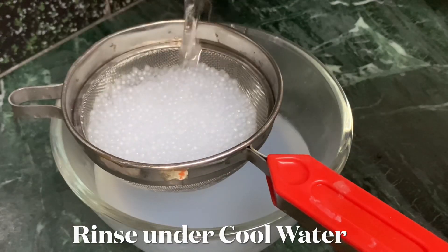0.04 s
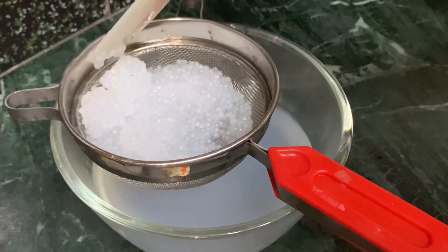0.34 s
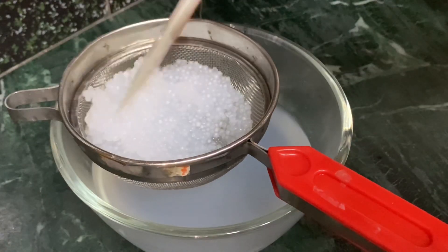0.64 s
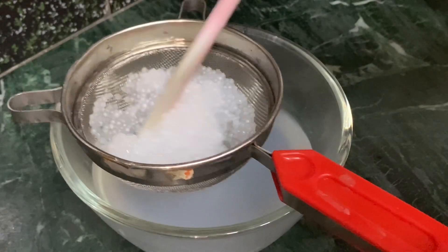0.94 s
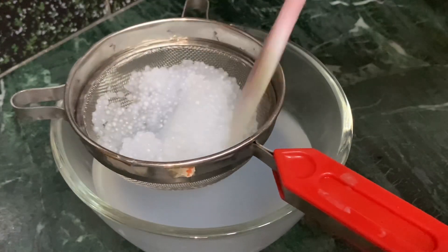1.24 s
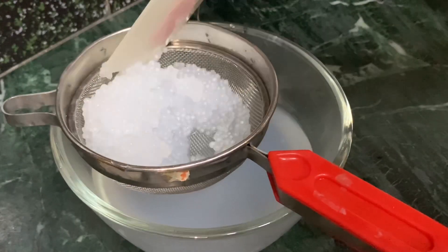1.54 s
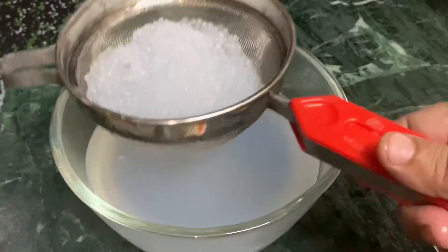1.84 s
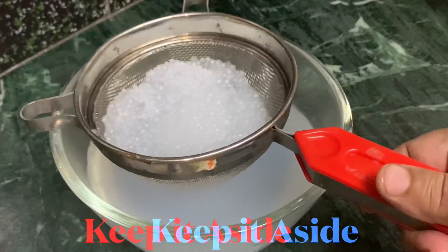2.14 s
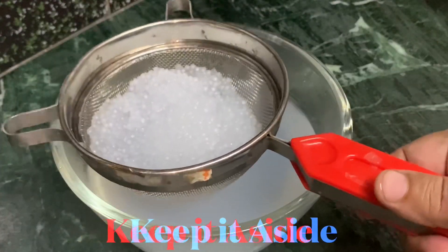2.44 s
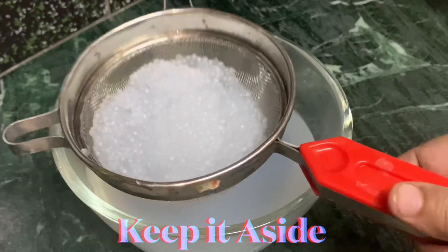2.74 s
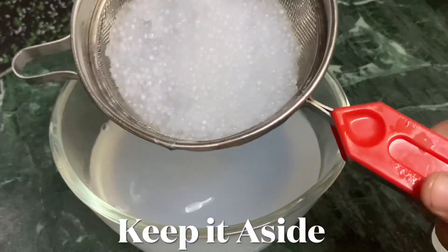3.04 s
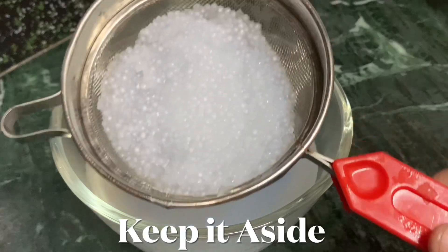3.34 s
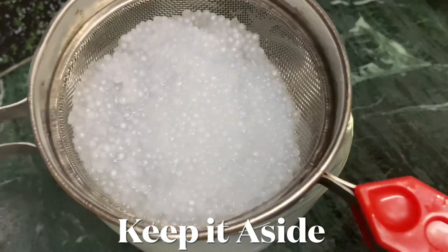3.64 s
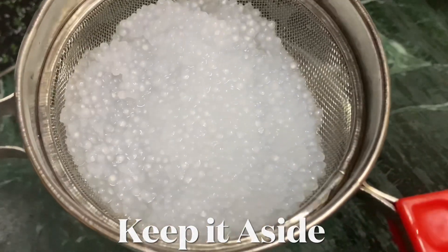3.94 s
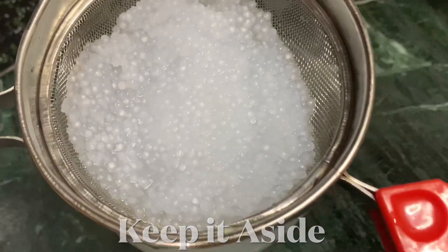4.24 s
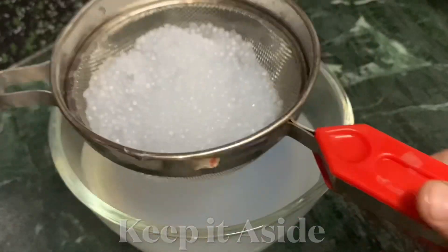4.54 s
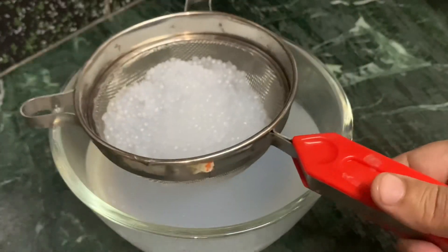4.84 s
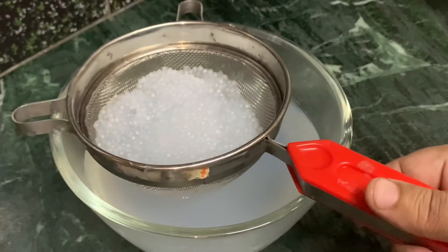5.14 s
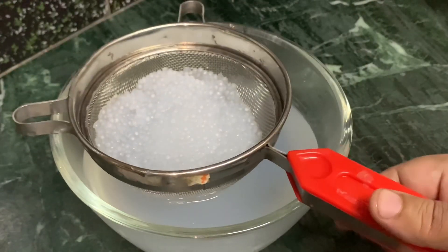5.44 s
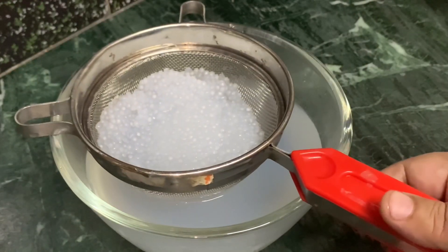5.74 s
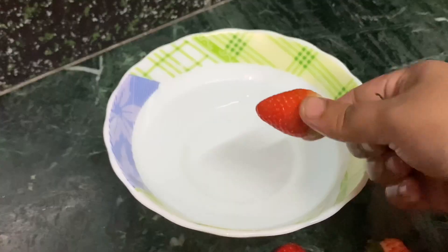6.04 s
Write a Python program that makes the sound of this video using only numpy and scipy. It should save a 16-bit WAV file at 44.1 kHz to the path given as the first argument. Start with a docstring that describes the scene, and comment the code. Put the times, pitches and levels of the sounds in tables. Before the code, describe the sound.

Wet pearls squelch as a spatula stirs a steel strainer, which then knocks and clinks on a glass bowl over a low kitchen hum.

```python
"""A small, hard kitchen hums throughout and reflects every sound. Wet sago pearls snap and squelch as a
spatula stirs them in a steel strainer, which thrums and scrapes on a glass bowl. From 2 s the strainer is
lifted and knocked on the rim three times to drain it: each impact excites the modes of hoop, mesh and
glass. From 4.8 s it is set back with a few light clinks and slides on the rim with a rising whine."""
import sys
import numpy as np
from scipy import signal
from scipy.fft import rfft, irfft, next_fast_len
from scipy.io import wavfile
from scipy.ndimage import uniform_filter1d

SR = 44100
rng = np.random.default_rng(int(sys.argv[2]) if len(sys.argv) > 2 else 0)


def unload_audio(sound):
    """Save the sound as a 16-bit wav file, at the path given as the first command line argument."""
    columns = np.transpose(np.atleast_2d(sound))
    # keep every value between -1 and 1, then stretch to whole-number steps
    steps = np.round(np.clip(columns, -1, 1) * 32767)
    wavfile.write(sys.argv[1], SR, steps.astype(np.int16))


N = 272538
TIME = np.arange(N) / SR
AGE = np.arange(SR * 3 // 4) / SR  # time since an excitation, t/s
STIR_S = (0.15, 1.87)  # the stirring sound starts and stops

# spectrum of a sharp contact with the steel: f/Hz, level/dB
CRACK_SPECTRUM = [(60, -30), (300, -12.5), (1500, -10), (2500, -8), (3700, -10), (4400, -7), (5100, -2),
                  (5900, -16.5), (7200, -11), (8700, -6), (10300, -7), (13000, -9.5), (15200, -7)]


def amp(db):
    """Amplitude ratio of a level in dB."""
    return 10 ** (np.asarray(db) / 20)


def unit(x):
    """Normalisation to rms 1."""
    return x / np.sqrt(np.mean(x ** 2) + 1e-20)


def along(points, hz):
    """Interpolation of (f/Hz, value) points on a logarithmic frequency axis."""
    f, values = np.transpose(points)
    return np.interp(np.log(hz + 1), np.log(f + 1), values)


def fade(t60, t=AGE):
    """Exponential decay by 60 dB in t60 seconds."""
    return np.exp(-np.log(1000) * t / t60)


def hump(s, half_s):
    """Gaussian swell to 1 at time s."""
    return np.exp(-((TIME - s) / half_s) ** 2)


def wobble(per_s, n=N):
    """Random modulation through per_s knots a second."""
    return np.interp(np.arange(n) * per_s / SR, np.arange(1024), rng.standard_normal(1024))


def band(hz, centre_hz, octaves):
    """Band-pass gain, halved at the given octaves from the centre."""
    return 1 / (1 + (np.log2((hz + 1) / centre_hz) / octaves) ** 2)


def resonance(hz, centre, width):
    """Frequency response of a damped oscillator."""
    return 1j * hz * width / (centre ** 2 - hz ** 2 + 1j * hz * width)


def filtered(x, response):
    """Linear filtering: the spectrum of x times a frequency response."""
    n = x.shape[-1]
    padded = next_fast_len(n + SR // 4)
    return irfft(rfft(x, padded) * response(np.fft.rfftfreq(padded, 1 / SR)), padded)[..., :n]


def noise(spectrum, shape):
    """Coloured Gaussian noise of rms 1."""
    return unit(filtered(rng.standard_normal(shape), lambda hz: amp(along(spectrum, hz))))


def grains(per_s, spread_db):
    """Shot noise: impulses at random moments and of random size."""
    size = amp(spread_db * np.minimum(rng.exponential(size=N), 4))
    return (rng.random(N) < per_s / SR) * rng.standard_normal(N) * size


def add(track, s, sound):
    """Superposition of a sound on the track from time s."""
    part = track[..., round(s * SR):][..., :sound.shape[-1]]
    part += sound[..., :part.shape[-1]]


def diffuse(pair):
    """Diffuse field: sound from all sides is coherent between left and right only in the bass."""
    # likeness of left and right: f/Hz, coherence
    coherence = [(30, .75), (70, 0.95), (200, 0.96), (380, 0.53), (700, 0), (15000, -0.28)]
    angle = lambda hz: np.arccos(np.clip(along(coherence, hz), -1, 1)) / 2
    mid, side = filtered(pair, lambda hz: np.array([np.cos(angle(hz)), np.sin(angle(hz))]))
    return np.array([mid + side, mid - side])


def kitchen(x, wet_db):
    """Direct sound reaches one side first; reflections from hard walls add a reverberant tail."""
    # lead of left over right: f/Hz, phase/rad
    phase_lead = [(0, 0), (1200, .6), (1800, -.8), (3000, -3.7), (4900, -10.3), (16000, -25.9)]
    # reverberation time: f/Hz, t60/s
    wall_decay = [(200, 0.21), (1500, 0.24), (6000, 0.25), (15000, 0.19)]
    lead = lambda hz: np.interp(hz, *np.transpose(phase_lead)) / 2
    direct = filtered(x, lambda hz: np.exp(1j * np.array([lead(hz), -lead(hz)])))
    hz, t, spectra = signal.stft(rng.standard_normal((2, SR // 2)), SR, nperseg=256)
    spectra = spectra * fade(along(wall_decay, hz)[:, None], t) * (1 - np.exp(-t / 0.0013))
    tail = signal.istft(spectra, SR, nperseg=256)[1]
    tail = diffuse(tail / np.linalg.norm(tail[0]))
    return direct + amp(wet_db) * signal.fftconvolve(x[None], tail, axes=1)[:, :len(x)]


def room_noise(lull_s=2.13, lull_half_s=.07, lull_db=-12, bass_hz=140):
    """Narrow-band noise hums under a broadband rush and hiss; the bass sinks briefly at lull_s."""
    # bands of the hum: f/Hz, half width/Hz, level/dB
    hum_bands = [(101, 16, -59.5), (180.2, 11, -58.5), (305.4, 56, -64), (660, 16, -74.5)]
    # soft rush: f/Hz, level/dB
    rush_spectrum = [(15, -56.5), (25, -26), (92, -5), (134, -11.5), (180, -1.5), (249, -17.5), (309, -9),
                     (344, -25), (384, -17), (659, -16), (754, -21), (1370, -25.5), (1890, -33.5),
                     (2610, -29.5), (3300, -38), (4500, -36.5), (5800, -46), (8000, -55.5), (9200, -46.5),
                     (12000, -52.5), (13400, -62), (15000, -55), (16000, -60)]
    # thin hiss: f/Hz, level/dB
    hiss_spectrum = [(500, -10), (1200, 3.5), (2000, -0.5), (2900, -6), (4800, -9), (5700, -15), (6400, 3),
                     (6900, 9), (7700, -10), (8800, 3), (10500, -10), (15000, -22)]
    # steps in loudness: start t/s, rush level/dB, hiss level/dB, hum gain/dB
    steps = [(0, -45, -70, 5), (1.876, -49, -87, 2), (6.041, -45.5, -71, 9)]
    start_s, *levels_db = np.transpose(steps)
    rush_gain, hiss_gain, hum_gain = amp(levels_db)[:, np.searchsorted(start_s[1:], TIME)]
    line = lambda c, w: filtered(rng.standard_normal((2, N)), lambda hz: resonance(hz, c, 2 * w) ** 2)
    hum = hum_gain * sum(amp(db) * unit(line(c, w)) for c, w, db in hum_bands)
    hiss = kitchen(hiss_gain * noise(hiss_spectrum, N), wet_db=-0.5)
    air = diffuse(hum + rush_gain * noise(rush_spectrum, (2, N))) + hiss
    bass = filtered(air, lambda hz: 1 / (1 + (hz / bass_hz) ** 8))
    return air - bass + bass * amp(lull_db * hump(lull_s, lull_half_s))


def pearl_snaps(gain_db=-1, snap_t60=0.009, octaves=0.7, mesh_db=-25, mesh_t60=.2):
    """Impulse excitation: wet pearls snap against the mesh and leave it ringing."""
    # snaps: t/s, level/dB, centre f/Hz
    snaps = [(.1062, -22.5, 10000), (.301, -52, 14000), (.3436, -45, 12000), (.5565, -28, 11500),
             (.6699, -39, 13000), (.721, -44, 12500), (.8635, -38, 9000), (.8716, -28.5, 10500),
             (.9283, -40, 13000), (.993, -41, 12000), (1.063, -45, 12500), (1.404, -40, 14000),
             (1.4451, -30, 11500), (1.4545, -29, 9500), (1.493, -44, 13500), (1.523, -46, 13000),
             (1.544, -45, 13500), (1.593, -42, 10500), (1.6667, -41, 8500), (1.7345, -32, 7800),
             (1.763, -41, 14500), (1.9707, -32, 12500), (2.9243, -43, 10000), (4.0422, -53, 11000)]
    out = np.zeros(N)
    for s, db, centre_hz in snaps:
        colour = lambda hz: amp(along(CRACK_SPECTRUM, hz)) * band(hz, centre_hz, octaves) ** 2
        snap = unit(filtered(rng.standard_normal(len(AGE)), colour)) * fade(snap_t60)
        mesh = amp(mesh_db) * wires(colour) * fade(mesh_t60)
        add(out, s, amp(db + gain_db) * (snap + mesh))
    return out


def wires(colour, mean_count=90):
    """High modal density: the woven mesh has a crowd of modes at random frequencies; rms 1."""
    hz = np.fft.rfftfreq(len(AGE), 1 / SR)
    chance, phase = rng.random((2, len(hz)))
    is_mode = chance < mean_count / len(hz)
    return unit(irfft(is_mode * np.exp(2j * np.pi * phase) * colour(hz), len(AGE)))


def pings(t60=.11):
    """Resonant filtering: noise through high modes dies away as a thin ping."""
    # pings: t/s, level/dB
    onsets = [(.150, -41), (5.2475, -54), (5.338, -39), (5.982, -50)]
    # their resonances: f/Hz, width/Hz, level/dB
    modes = [(7000, 3000, -14), (12400, 1000, -2), (14540, 280, 5), (15200, 460, -9)]
    response = lambda hz: sum(amp(db) * resonance(hz, c, w) ** 2 for c, w, db in modes)
    out = np.zeros(N)
    for s, db in onsets:
        sizzle = unit(filtered(rng.standard_normal(len(AGE)), response))
        add(out, s, amp(db) * sizzle * fade(t60))
    return out


def stirring(spring_hz=94, bowl_hz=178, bowl_db=-12, lean_db=-41.5, trickle_db=-67, squelch_db=-68):
    """Forced vibration: strokes set the loaded strainer thrumming while pearls unstick and squelch."""
    # spatula strokes, then shakes by hand: peak t/s, half length/s, thrum level/dB, sliding level/dB
    strokes = [(0.188, 0.052, -46.5, -49), (0.323, 0.029, -38, -68), (0.617, 0.069, -36, -68),
               (.99, .09, -38, -51), (1.302, 0.035, -39, -42), (1.556, 0.067, -32.5, -63),
               (1.678, 0.019, -31, -74), (1.776, 0.056, -36, -52.5), (1.925, .04, -37, -75),
               (2.44, .05, -38, -75)]
    # pearls unsticking: f/Hz, level/dB
    wet_spectrum = [(400, 6), (1500, -5), (3000, -9), (5600, -13), (6800, -2), (10000, -1), (12400, 3),
                    (15300, 2)]
    active = uniform_filter1d(1. * ((TIME > STIR_S[0]) & (TIME < STIR_S[1])), size=1000)
    push, sliding = amp(lean_db) * active, amp(trickle_db) * active  # between strokes
    for s, half_s, push_db, slide_db in strokes:
        push = push + amp(push_db) * hump(s, half_s)
        sliding = sliding + amp(slide_db) * hump(s, half_s)
    response = lambda hz, c: resonance(hz, c, width=11) * resonance(hz, c, width=26.7)
    mode = lambda c: unit(filtered(rng.standard_normal(N), lambda hz: response(hz, c)))
    spring = mode(spring_hz)
    spring = unit(spring / (np.abs(signal.hilbert(spring)) + .5))  # steady pressure evens the swings
    thrum = spring + amp(bowl_db) * mode(bowl_hz)
    clumps = amp(5.5 * wobble(per_s=60))  # pearls come loose in bunches
    ticks = filtered(grains(per_s=1100, spread_db=4), lambda hz: amp(along(wet_spectrum, hz)))
    slush = amp(-4) * sliding * unit(clumps * ticks)
    squelch = amp(squelch_db + 3 * wobble(per_s=14)) * bubbles()
    return amp(-3.5) * push * thrum + kitchen(slush + squelch, wet_db=-5)


def bubbles(count=420, centre_hz=950, spread_octaves=.7, life_cycles=22, spread_db=4):
    """Bubble resonance: air pockets pop between the wet pearls, each at its own pitch."""
    out = np.zeros(N)
    t = AGE[AGE < .06]
    for s, (pitch, size) in zip(rng.uniform(*STIR_S, count), rng.standard_normal((count, 2))):
        hz = centre_hz * 2 ** (spread_octaves * pitch)
        envelope = fade(life_cycles / hz, t) * (1 - np.exp(-t * hz))
        add(out, s, amp(spread_db * min(size, 1.5)) * np.sin(2 * np.pi * hz * t) * envelope)
    return unit(out)


def scraping(scrape_octaves=1.37, squeak_octaves=0.03):
    """Stick-slip friction: edges jerk over the steel, broadband as a scrape, narrow as a squeak; one brief
    burst sounds as a dull tap."""
    # steel under the spatula or on the rim, the last row a brief dull tap: t/s, half length/s, level/dB, centre
    # f/Hz
    scrapes = [(.558, .003, -49, 2800), (.872, .011, -43, 1400), (.95, .03, -48, 1050),
               (1.290, .018, -42, 1400), (1.283, .014, -44, 9000), (1.2945, .003, -37, 9500),
               (1.310, .005, -33, 6500), (1.328, 0.015, -28, 950), (4.846, .012, -46, 1400),
               (5.412, 0.005, -42, 2600)]
    # the rubbed rim sings: t/s, half length/s, level/dB, f/Hz
    squeaks = [(.973, .03, -54, 1880), (1.326, .011, -35, 3205), (1.328, .011, -33, 4965),
               (1.376, .022, -45, 4985)]
    out = np.zeros(N)
    for events, octaves in [(scrapes, scrape_octaves), (squeaks, squeak_octaves)]:
        for s, half_s, db, centre_hz in events:
            slips = grains(per_s=2800, spread_db=5)
            rub = unit(filtered(slips, lambda hz: band(hz, centre_hz, octaves) ** 2))
            out += amp(db) * rub * hump(s, half_s)
    return kitchen(out, wet_db=-9)


def node(hz, weak_hz, depth_db=-13, octaves=.2):
    """Modes with a node at the point of contact are weakly excited: a notch around weak_hz."""
    return amp(depth_db * band(hz, weak_hz, octaves))


def ring(modes, weak_hz, tilt_db=0, pivot_hz=5000, flutter_db=3, flutter_turns=.1):
    """Free decay of modes struck at random strengths; loose contact makes level and phase waver."""
    hz, db, t60 = np.transpose(modes)[:, :, None]
    flutter = lambda: np.array([wobble(per_s=110, n=len(AGE)) for _ in modes])
    struck_db = db + tilt_db * np.log2(hz / pivot_hz) + rng.standard_normal(hz.shape)
    size = amp(struck_db + flutter_db * flutter())
    turns = hz * AGE + rng.random(hz.shape) + flutter_turns * flutter()
    return np.sum(size * node(hz, weak_hz) * fade(t60) * np.sin(2 * np.pi * turns), 0)


def strainer_impacts(crack_t60=0.02, thud_t60=.055, thud_db=-9, body_db=4,
                     mesh_db=-22, mesh_hz=11000, mesh_t60=.3, bite_s=0.0006, loosen_s=.006):
    """Impact excitation: steel on glass cracks, thumps the bowl, rings the hoop and rattles the mesh."""
    # touches, several in a skipping knock: t/s, crack level/dB, thump level/dB, hoop level/dB, weak f/Hz
    contacts = [(1.320, -13, -24, -31, 14500), (1.326, -15, -20, -33, 14500), (2.036, -5, -31, -17, 4100),
                (2.0395, -11, -24, -19, 4100), (2.0425, -9, -34, -18, 4100), (2.0455, -11, -27, -18, 4100),
                (2.2895, -12, -25, -38, 4200), (2.296, -8, -30, -13, 11200), (2.299, -7, -22, -16, 11200),
                (2.304, -21, -30, -20, 4000), (2.4975, -3.5, -23, -25, 11700),
                (2.5015, -12, -28, -24, 7700), (2.506, -8, -25, -14.5, 11800),
                (2.509, -7.5, -22, -14.5, 7900), (4.837, -20, -40, -44, 7200),
                (4.8415, -26, -42, -48, 7200), (4.847, -33, -42, -53, 7200), (5.086, -31, -41, -48, 7200),
                (5.411, -62, -33, -75, 7200)]
    # the steel hoop: f/Hz, level/dB, t60/s
    hoop_modes = [(3775, -18, .025), (3945, -13, .05), (4980, -7, .045), (6450, -23, .09), (7090, 0, .045),
                  (7065, -12, .21), (7190, -9, .07), (7285, -16, .16), (7721, -10, .17), (7830, -11, .11),
                  (8560, -10, .06), (8880, -8, .1), (9200, -16, .031), (9980, -11, .06), (10746, -14, .08),
                  (10825, -11, .06), (11400, -17, .07), (12100, -14, .09), (13120, -9, .06),
                  (13650, -13, .08), (14700, -17, .06), (15470, -15, .08)]
    # bowl, water and counter knocked together: f/Hz, width/Hz, level/dB
    body_modes = [(179, 11, 9), (298, 28, 3), (441, 27, -3.5), (570, 50, -2), (690, 60, -9), (983, 60, -7),
                  (1186, 43, -5.5), (1400, 90, -9), (1732, 66, -6), (2128, 170, -14), (2450, 150, -15)]
    # dull part of the impact: f/Hz, level/dB
    thud_spectrum = [(100, -29), (250, -13), (450, 14), (900, 0), (1300, -1.5), (4000, -12), (8000, -40)]
    out = np.zeros((2, N))
    body = lambda hz: sum(amp(db) * resonance(hz, c, w) for c, w, db in body_modes)
    knock = filtered(fade(.0012), body)
    knock = amp(body_db) * knock / np.abs(knock).max()
    bite = 1 - np.exp(-AGE / bite_s)  # the hoop skids into each contact
    for s, crack_db, thump_db, hoop_db, weak_hz in contacts:
        rattle = amp(4 * wobble(per_s=330, n=len(AGE)) * (1 - np.exp(-AGE / loosen_s)))
        crack = filtered(noise(CRACK_SPECTRUM, len(AGE)), lambda hz: node(hz, weak_hz))
        crack = amp(crack_db) * crack * rattle * fade(crack_t60)
        thud = amp(thump_db + thud_db) * noise(thud_spectrum, len(AGE)) * rattle * fade(thud_t60)
        mesh = wires(lambda hz: band(hz, mesh_hz, .9) ** 2 * node(hz, weak_hz))
        mesh = amp(mesh_db) * unit(rattle * mesh) * fade(mesh_t60)
        steel = amp(hoop_db) * (ring(hoop_modes, weak_hz) + mesh)
        add(out, s, kitchen(bite * (crack + thud + steel), wet_db=-17))
        add(out, s, kitchen(amp(thump_db) * knock, wet_db=-3))
    return out


def bowl_chimes(note_hz=1711, free_t60=5, beat_hz=11, twin_db=-9, lifted_s=2.035, lowered_s=2.29):
    """Damping and mode splitting: the glass rings freely, but fades and beats under the strainer."""
    # knocks: t/s, overtone level/dB, tilt/(dB per octave), weak f/Hz, note level/dB, contact t60/s
    knocks = [(1.320, -30, 0, 12280, -53, .13), (2.037, -29, -7, 5200, -33.5, .25),
              (2.290, -22, 0, 12280, -35, .33), (2.498, -17, 4, 3500, -34, .36),
              (4.837, -35.5, -3, 9497, -34.5, .33), (5.086, -45, -2, 9497, -55, .28)]
    # overtones of the free bowl, some in close pairs: f/Hz, level/dB, t60/s
    glass_modes = [(3127, -8, .42), (4880, -7, .3), (4902, -4.5, .4), (5068, -8, .2), (7036, -13, .5),
                   (9497, -6, .24), (12280, -16, .22)]
    out = np.zeros((2, N))
    for s, glass_db, tilt_db, weak_hz, note_db, resting_t60 in knocks:
        t = s + AGE
        resting_s = np.cumsum((t < lifted_s) | (t > lowered_s)) / SR  # time spent under the strainer
        damping = fade(resting_t60, resting_s)
        twin = amp(twin_db) * np.sin(2 * np.pi * (note_hz * t + beat_hz * resting_s))
        note = (np.sin(2 * np.pi * note_hz * t) + twin) / (1 + amp(twin_db))
        add(out, s, kitchen(amp(glass_db) * ring(glass_modes, weak_hz, tilt_db) * damping, wet_db=-6))
        add(out, s, kitchen(amp(note_db) * note * fade(free_t60) * damping, wet_db=-12))
    return out


def drip(s=1.972, db=-28, hz=1150, t60=0.05):
    """Bubble resonance: the air trapped by one drop rings as a damped sine."""
    out = np.zeros(N)
    add(out, s, amp(db) * np.sin(2 * np.pi * hz * AGE) * fade(t60))
    return out


def rim_slide(start_s=5.1, end_s=6.04, start_hz=2150, end_hz=3800, rub_db=-61, whine_db=-68, note_db=-63):
    """Sliding friction: the strainer speeds up on the rim, its whine rises and the bowl's note stirs."""
    speed = np.clip((TIME - start_s) / (end_s - start_s), 0, 1) * (TIME < end_s)
    slips = lambda colour: unit(filtered(grains(per_s=3930, spread_db=.5), colour))
    rub = amp(rub_db) * slips(lambda hz: band(hz, centre_hz=1700, octaves=2.1) ** 2)
    pitch_hz = start_hz + (end_hz - start_hz) * speed ** 1.5
    roughness = slips(lambda hz: np.exp(-(hz / 380) ** 2))  # widens the whine into a band
    whine = amp(whine_db) * unit(roughness * np.sin(2 * np.pi * np.cumsum(pitch_hz) / SR))
    note = amp(note_db) * slips(lambda hz: resonance(hz, centre=1685, width=130) ** 2)
    return kitchen(speed * rub + speed ** 3 * note + np.sqrt(speed) * whine, wet_db=-0.5)


def scene():
    """Superposition of all sources, a little louder on the right."""
    knocks = strainer_impacts() + bowl_chimes()
    small_sounds = kitchen(pearl_snaps() + pings() + drip(), wet_db=-11)
    mix = knocks + small_sounds + scraping() + stirring() + rim_slide() + room_noise()
    return mix * amp([[-.4], [.4]])


def record(dry, top_hz=15750):
    """Gain modulation and band limiting: the level dips briefly three times; a steep low-pass follows."""
    # dips: t/s, half width/s, level/dB
    dips = [(0.138, 0.014, -19.5), (1.876, 0.012, -15), (6.043, .014, -15)]
    gain_db = sum(db * hump(s, half_s) for s, half_s, db in dips)
    return filtered(dry * amp(gain_db), lambda hz: 1 / np.sqrt(1 + (hz / top_hz) ** 300))


dry = scene()
out = record(dry)
unload_audio(out)
```